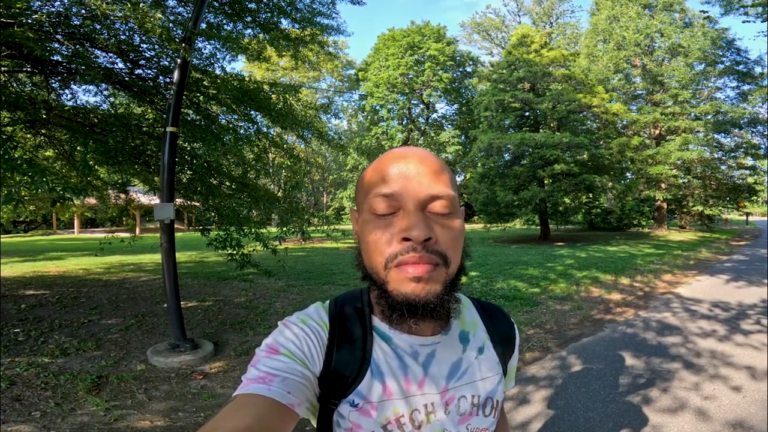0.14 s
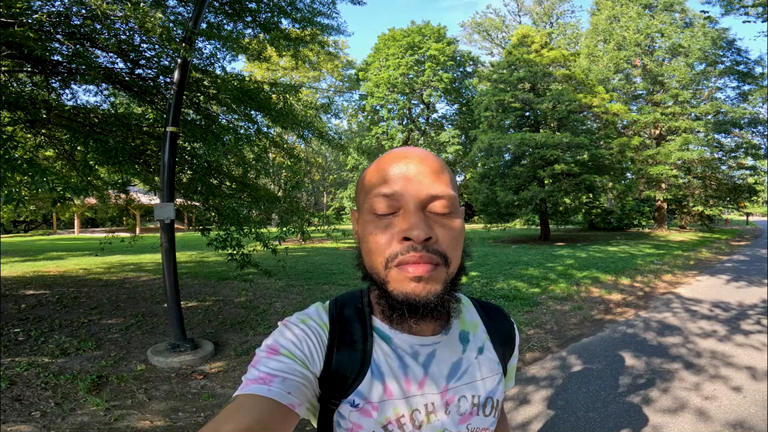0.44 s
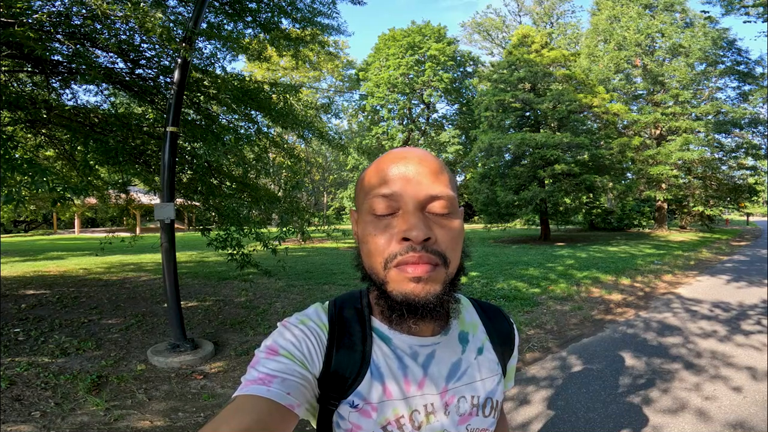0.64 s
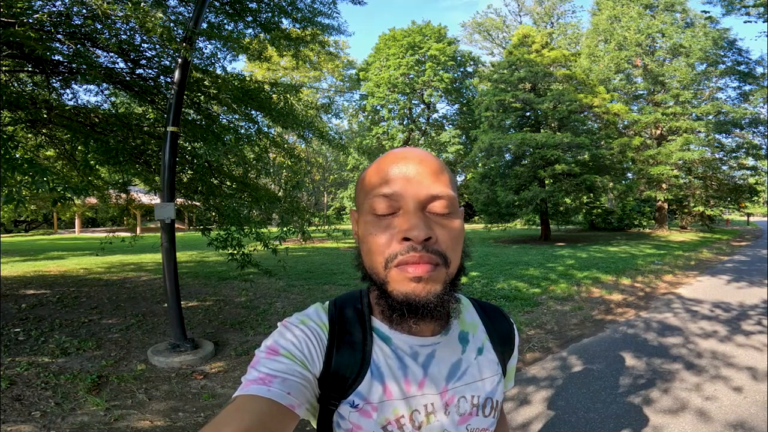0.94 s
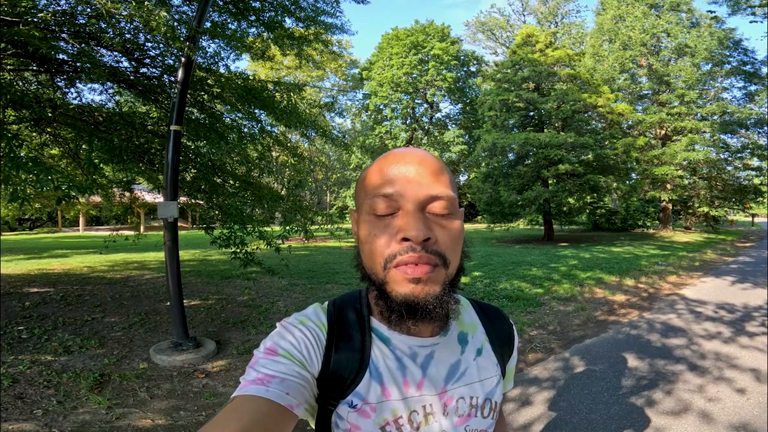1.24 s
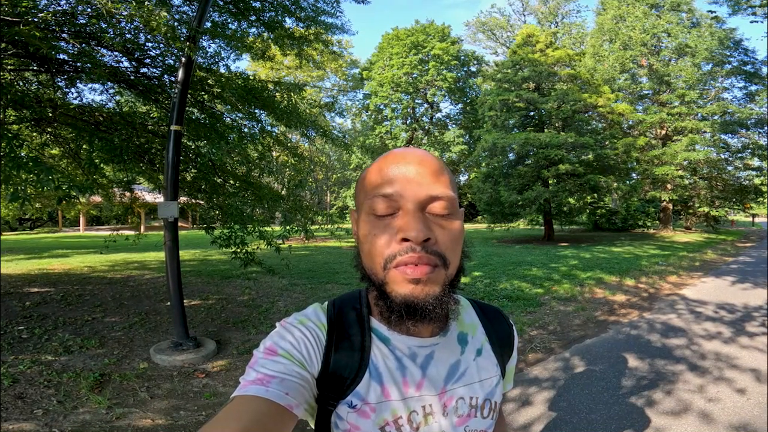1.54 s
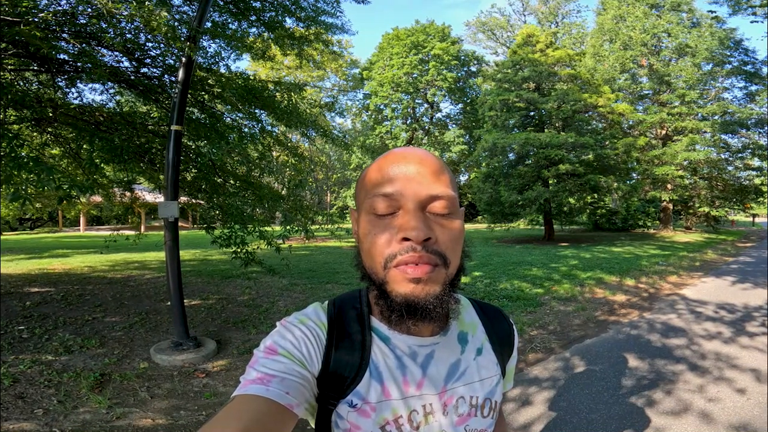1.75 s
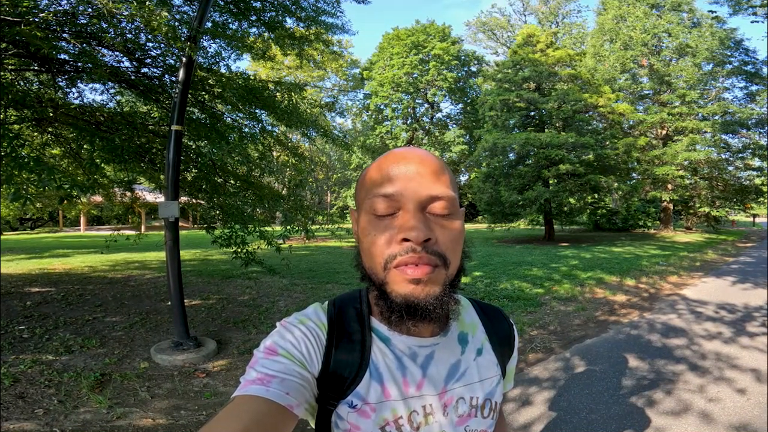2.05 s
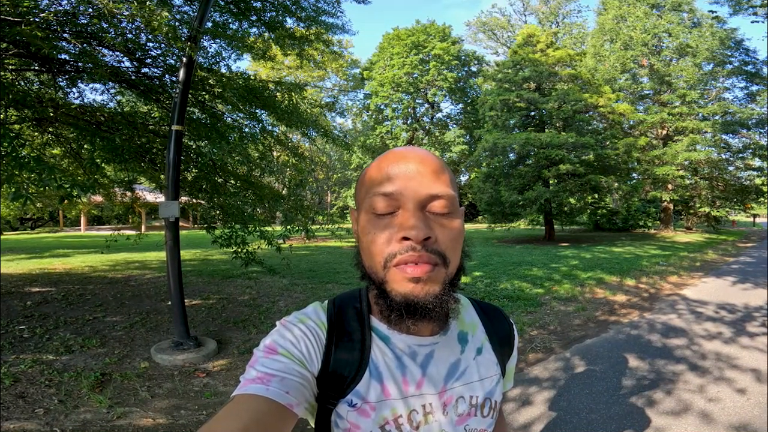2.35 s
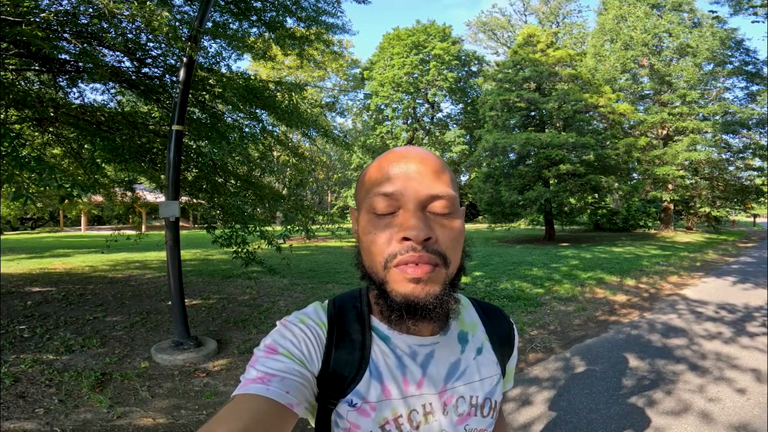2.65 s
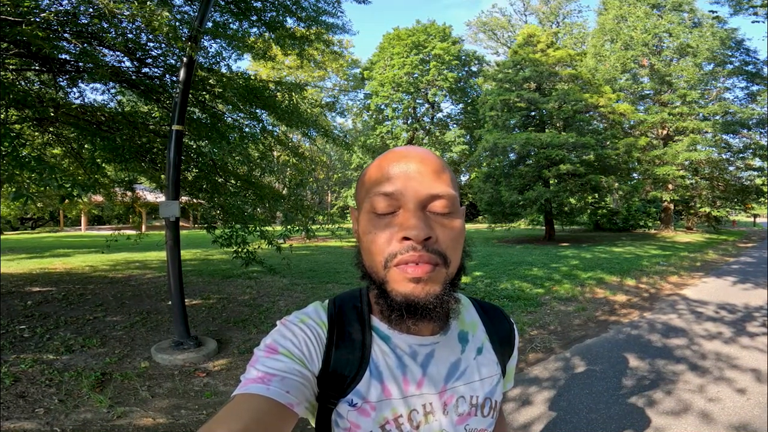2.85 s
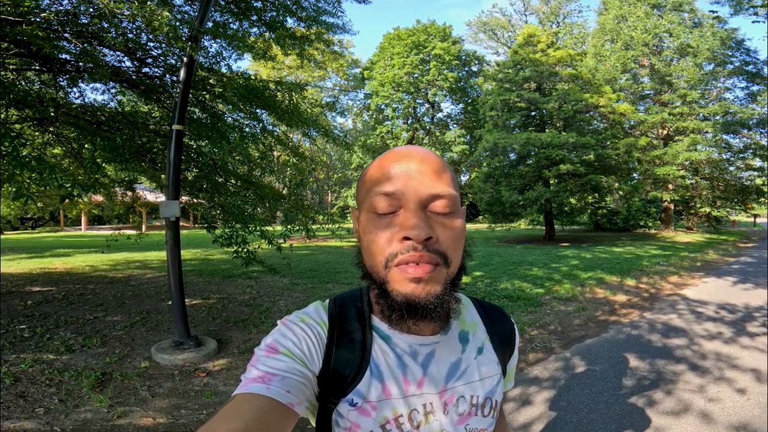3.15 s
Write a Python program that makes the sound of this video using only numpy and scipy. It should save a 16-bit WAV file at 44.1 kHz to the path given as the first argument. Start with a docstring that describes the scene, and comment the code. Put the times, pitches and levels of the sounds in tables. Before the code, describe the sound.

Many cicadas buzz steadily in park trees, a rapidly throbbing high chorus; part of it fades after about a second while the rest continues. Soft distant traffic rumble and slight breeze thumps reach a small stereo microphone.

```python
"""A cicada chorus in the trees of a park, heard through a small two-port microphone.
Each insect is a throbbing train of tymbal clicks (about twelve throbs a second) scattered by foliage.
One tree sings steadily, another slowly dies down, and a few near insects ring out on single pitches.
Distant traffic rumbles underneath as shaped noise with fuzzy engine hums; a breeze nudges the ports
as low decaying waves, and one tiny tick is a very short high tone."""
import sys
import numpy as np
from scipy import signal
from scipy.fft import rfft, irfft
from scipy.io import wavfile
from scipy.ndimage import uniform_filter1d

SR = 44100
rng = np.random.default_rng(int(sys.argv[2]) if len(sys.argv) > 2 else 0)


def unload_audio(sound):
    """Save the sound as a 16-bit wav file, at the path given as the first command line argument."""
    columns = np.transpose(np.atleast_2d(sound))
    # keep every value between -1 and 1, then stretch to whole-number steps
    steps = np.round(np.clip(columns, -1, 1) * 32767)
    wavfile.write(sys.argv[1], SR, steps.astype(np.int16))


def rack_gain(trim_db):
    """Turn a fader trim in dB into the linear factor to multiply a signal by."""
    fader = np.asarray(trim_db, float)
    return 10 ** (fader / 20)


N = 145530  # samples, 3.3 s

# Level balance of the two ports: pitch_hz, left_minus_right_db
PORT_BALANCE = [(60, 0), (110, -2.5), (200, -2.0), (380, -2.0), (700, -0.5), (1290, 0.5), (2380, -0.5),
                (4400, -1.5), (8120, -1.5), (15000, 3)]


def evened(x):
    """Scales a sound to rms 1, over all its channels together."""
    return x / np.sqrt(np.mean(x ** 2) + 1e-20)


def read(points, hz):
    """Reads a curve of (Hz, value) points, straight between them on a log frequency axis."""
    f, value = np.transpose(points)
    return np.interp(np.log(hz + 1), np.log(f + 1), value)


def wander(rate_hz):
    """Slow random drift of rms 1: twenty sines up to rate_hz, the slower ones larger."""
    t = np.arange(N) / SR
    drift = np.zeros(N)
    for f in np.geomspace(rate_hz / 20, rate_hz, num=20):
        drift += np.sin(2 * np.pi * (f * t + rng.random())) / np.sqrt(f)
    return evened(drift)


def ring(x, hz, width_hz):
    """A two-pole resonance, its output scaled to rms 1."""
    r = np.exp(-np.pi * width_hz / SR)
    return evened(signal.lfilter([1], [1, -2 * r * np.cos(2 * np.pi * hz / SR), r * r], x))


def ports(a, b, colour):
    """Colours two unrelated sounds and mixes them into two partly alike microphone ports."""
    # Likeness of the ports: pitch_hz, likeness (0 to 1)
    likeness = [(60, 0.97), (130, 1), (290, .92), (640, 0.62), (1410, 0.6), (3100, 0.71), (6820, .86),
                (10000, 0.76), (12500, 0.42), (15000, 0.51)]
    # Phase between the ports: pitch_hz, left_lead_rad
    left_lead = [(0, -0.55), (690, 0.32), (1890, -0.25), (3010, -0.31), (7240, -0.26), (15200, -0.065)]
    hz = np.fft.rfftfreq(N, 1 / SR)
    same = np.clip(read(likeness, hz), 0, 1)
    common = np.sqrt((1 + same) / 2) * rfft(a)
    apart = np.sqrt((1 - same) / 2) * rfft(b)
    # each port takes half of the level and phase difference
    half = rack_gain(read(PORT_BALANCE, hz) / 2) * np.exp(.5j * read(left_lead, hz))
    pair = np.array([(common + apart) * half, (common - apart) / half])
    return evened(irfft(pair * rack_gain(read(colour, hz)), N))


def tymbal():
    """One insect clicks its tymbals in an uneven train that throbs: each beat jumps up and decays."""
    clicks_per_s, rate_spread, gap_jitter, click_size_db = 240, .2, .25, 3
    throb_hz, throb_spread, throb_decay_beats, throb_db = 11.6, .05, 0.34, 9
    distance_db = 2  # spread of loudness with distance
    own, pace, phase, near = rng.standard_normal(4)
    rate = clicks_per_s * (1 + rate_spread * np.tanh(own))
    gaps_s = abs((1 + gap_jitter * rng.standard_normal(2400)) / rate)
    at = (np.cumsum(gaps_s) * SR).astype(int) - 2000  # samples; already clicking at the start
    size = rack_gain(click_size_db * rng.standard_normal(2400))
    keep = (at >= 0) & (at < N)
    beat = (throb_hz * (1 + throb_spread * pace) * at[keep] / SR + phase) % 1
    clicks = np.zeros(N)
    clicks[at[keep]] = size[keep] * rack_gain(throb_db * np.exp(-beat / throb_decay_beats) + distance_db * near)
    return clicks


def leaves(clicks, shift):
    """Foliage scatters every click into a short noisy tail, in a colour of the insect's own."""
    t60_s, colour_db, colour_spacing_hz = 0.032, 8, 3500
    hz = np.fft.rfftfreq(2048, 1 / SR)
    lag_s = np.arange(2048) / SR
    # shift, in turns, moves the favoured parts of the band
    colour = rack_gain(colour_db * np.cos(2 * np.pi * (hz / colour_spacing_hz + shift)))
    echo = irfft(rfft(rng.standard_normal(2048)) * colour) * rack_gain(-60 * lag_s / t60_s)
    return signal.oaconvolve(clicks, evened(echo))[:N]


def singers():
    """A crowd of forty insects, out of step, their colours spread evenly, scaled to rms 1."""
    count = 40
    return evened(sum(leaves(tymbal(), k / count) for k in range(count)))


def tree(colour, column, left_db):
    """One tree full of cicadas, two crowds spread over the ports, following its common effort."""
    # Loudness of the two trees: time_s, fading_tree_db, steady_tree_db
    efforts = [(0, -37.5, -38), (.6, -38.5, -37.5), (1.2, -38.5, -37), (1.6, -42, -36.5),
               (2.1, -42.5, -36.5), (2.6, -44, -37), (3.3, -44.5, -37.5)]
    rows = np.transpose(efforts)
    effort_db = np.interp(np.arange(N) / SR, rows[0], rows[column])
    side_db = np.array([[left_db / 2], [-left_db / 2]])
    return ports(singers(), singers(), colour) * rack_gain(effort_db + side_db)


def strands():
    """Pairs of near insects, their clicks ringing on one pitch, a little left or right."""
    # Near insects whose tymbals ring out of the chorus: pitch_hz, width_hz, level_db
    near_pairs = [(3836, 29, -54.5), (4426, 93, -64), (5060, 45, -66), (5210, 92, -56.5), (5910, 51, -56),
                  (6390, 95, -57.5), (6410, 90, -58), (7010, 120, -61), (7519, 33, -64)]
    out = np.zeros((2, N))
    for hz, width_hz, level_db in near_pairs:
        pair = leaves(tymbal() + tymbal(), rng.random())
        song = ring(ring(pair, hz, width_hz), hz, 3 * width_hz)
        drift_db = 2.5 * wander(3.23)
        side_db = 2.3 * rng.standard_normal() * np.array([[.5], [-.5]])
        out += rack_gain(level_db + drift_db + side_db) * song
    return out


def traffic():
    """Distant road: shaped noise with patches drifting in pitch and time, and fuzzy engine hums."""
    # Colour of the rumble: pitch_hz, relative_density_db
    rumble_colour = [(11, -60), (18, -1), (38, -2), (81, -4), (140, -11.5), (197, -15), (266, -17.5),
                     (383, -28.5), (507, -29), (595, -31), (855, -34), (965, -31), (1500, -35),
                     (1800, -40.5), (2200, -27), (2860, -49), (4840, -120)]
    # Far engines: pitch_hz, width_hz, level_db
    engines = [(40.5, 5.1, -48.5), (76.66, 5.9, -48), (102.2, 8.2, -60), (198.7, 17, -63.5),
               (517.5, 50, -73)]
    # Loudness of the rumble along the road: time_s, change_db
    road = [(0, -1.5), (.4, 1), (1, 1), (1.4, 0), (2, -0.5), (2.6, 0.6), (3.3, -0.3)]
    rumble_db, swell_db, patch_db = -42, .5, 1.2
    frames = N // 512 + 5
    a, b, c, d, patch = rng.standard_normal((frames, 1025, 5)).T
    patch = uniform_filter1d(patch, size=10, axis=0)  # smooth over pitch
    patch = uniform_filter1d(patch, size=12, axis=1)  # smooth over time
    spectra = np.array([a + 1j * b, c + 1j * d]) * rack_gain(patch_db * evened(patch))
    one, two = signal.istft(spectra, nperseg=2048, noverlap=1536)[1][:, :N]
    road_db = np.interp(np.arange(N) / SR, *np.transpose(road))
    out = rack_gain(rumble_db + road_db + swell_db * wander(2.31)) * ports(one, two, rumble_colour)
    for hz, width_hz, level_db in engines:
        noise = rng.standard_normal(N + SR)  # one extra second lets the resonance build up
        hum = ring(ring(noise, hz, width_hz), hz, 2 * width_hz)[SR:]
        side_db = read(PORT_BALANCE, hz) * np.array([[.5], [-.5]])
        out += rack_gain(level_db + side_db) * hum
    return out


def tick():
    """One very short, bright tick, alike in both ports: a high tone under a bell-shaped envelope."""
    start_s, peak_db, pitch_hz, length_s = 1.2688, -44.5, 13500, .00007
    t = np.arange(N) / SR - start_s  # zero at the peak
    return rack_gain(peak_db) * np.exp(-(t / length_s) ** 2) * np.cos(2 * np.pi * pitch_hz * t)


def breeze():
    """Soft low pushes of air: sines that rise fast and fade, stronger on the right port."""
    # Breeze on the ports: start_s, fade_s, level_db (before rise, fade, doubling and side)
    puffs = [(1.71, 0.065, -36.5), (3.141, 0.016, -38), (3.269, 0.036, -33)]
    pitch_hz, left_minus_right_db, rise_s = 43.7, -6, 0.0042
    push = np.zeros(N)
    for start_s, fade_s, level_db in puffs:
        t = np.maximum(np.arange(N) / SR - start_s, 0)
        envelope = (1 - np.exp(-t / rise_s)) * np.exp(-t / fade_s)
        push += rack_gain(level_db) * envelope * np.sin(2 * np.pi * pitch_hz * t)
    return 2 * push * rack_gain(left_minus_right_db * np.array([[.5], [-.5]]))


def scene():
    """Two trees of cicadas, near singers, the road, the breeze and the tick add up in the air."""
    # Colour of the fading tree: pitch_hz, relative_density_db
    fading_colour = [(1000, -60), (1700, -25.5), (1810, -23.5), (2180, -16.5), (2280, -20), (2830, -1),
                     (2990, -4), (3160, -0.5), (3660, -1.5), (3980, -3.5), (4650, -17), (5150, -3.5),
                     (5700, -2), (7380, -8.5), (8330, -21), (11900, -35.5), (15500, -47)]
    # Colour of the steady tree: pitch_hz, relative_density_db
    steady_colour = [(1000, -66), (1700, -27), (1970, -29.5), (2390, -10.5), (3220, -7), (3400, -4.5),
                     (3590, -2), (3980, -3.5), (4240, -4.5), (4870, -3), (5650, -0.5), (6370, -7.5),
                     (7380, -13), (8640, -26), (10500, -30.5), (13700, -45), (15500, -58)]
    fading = tree(fading_colour, column=1, left_db=3)  # left minus right, dB
    steady = tree(steady_colour, column=2, left_db=-0.1)
    return fading + steady + strands() + traffic() + tick() + breeze()


def band_limit(x):
    """A steep low-pass at the top of the band."""
    return signal.sosfilt(signal.butter(12, 15610, fs=SR, output="sos"), x)


def record(dry):
    """The two port signals become the finished stereo recording."""
    return band_limit(dry)


dry = scene()
out = record(dry)
unload_audio(out)
```